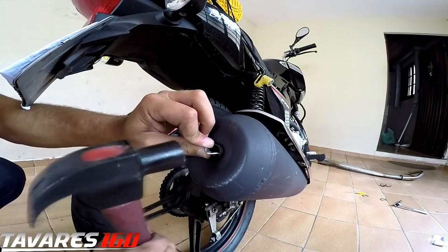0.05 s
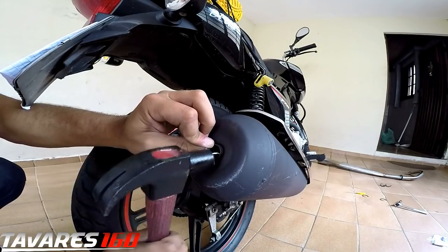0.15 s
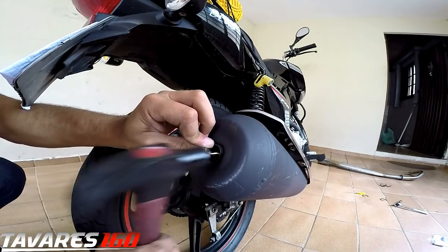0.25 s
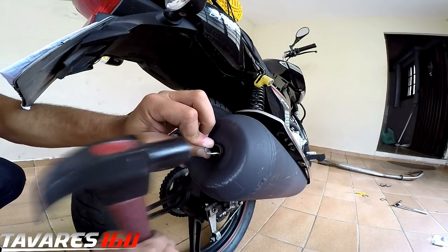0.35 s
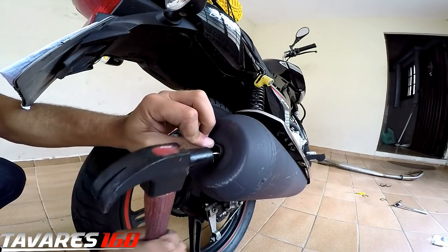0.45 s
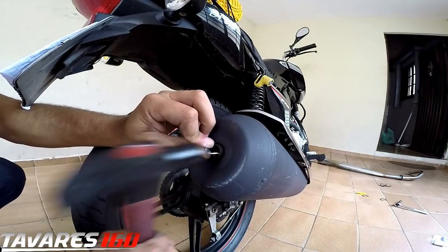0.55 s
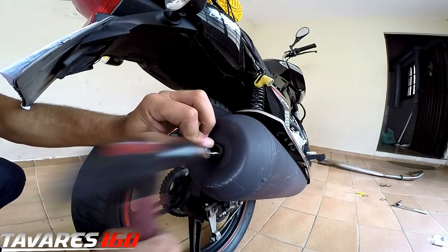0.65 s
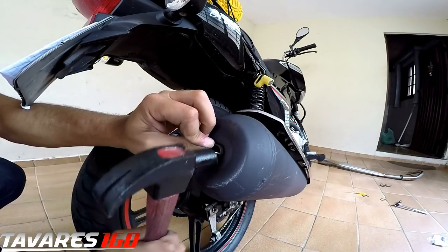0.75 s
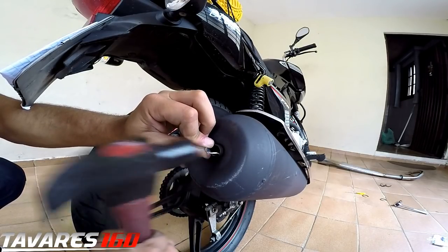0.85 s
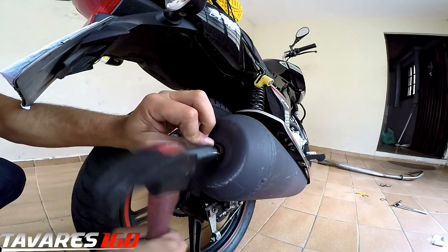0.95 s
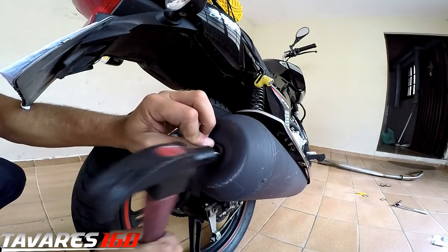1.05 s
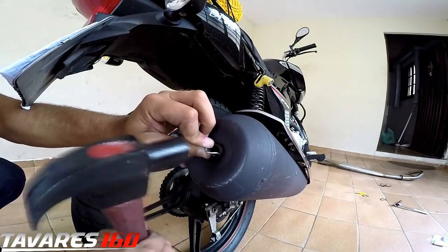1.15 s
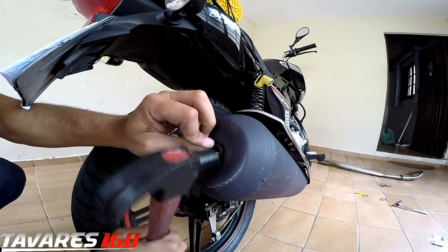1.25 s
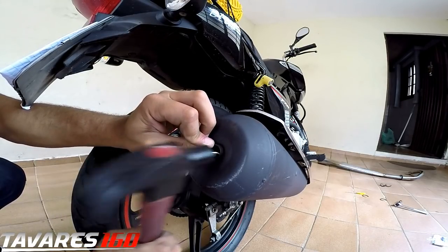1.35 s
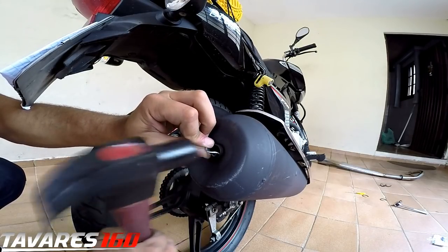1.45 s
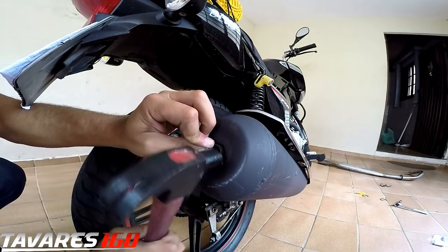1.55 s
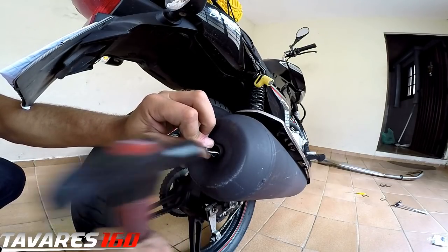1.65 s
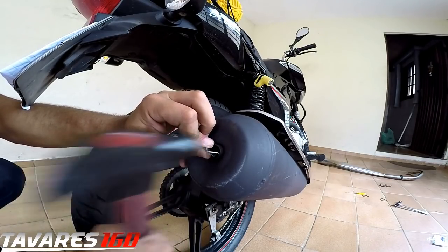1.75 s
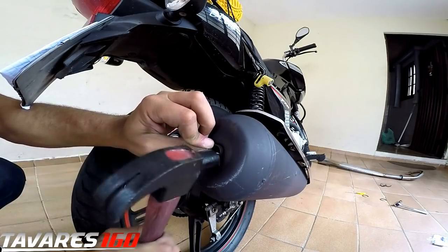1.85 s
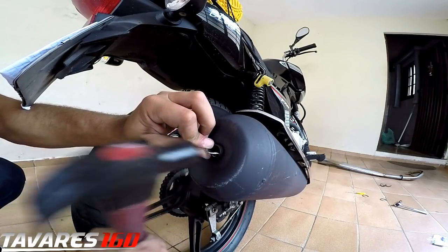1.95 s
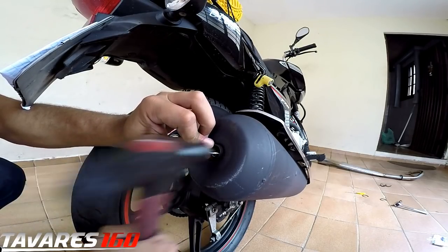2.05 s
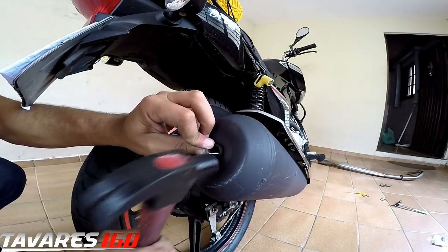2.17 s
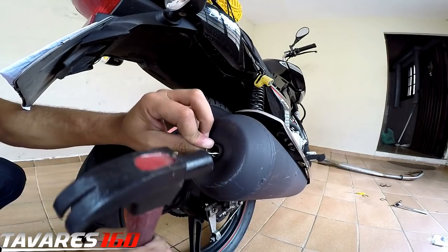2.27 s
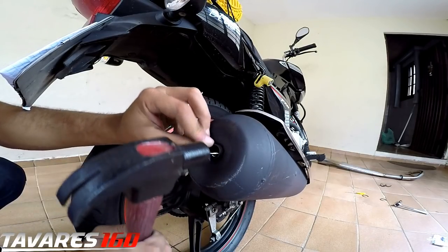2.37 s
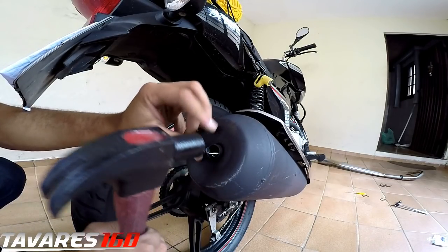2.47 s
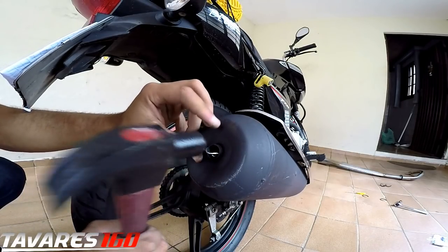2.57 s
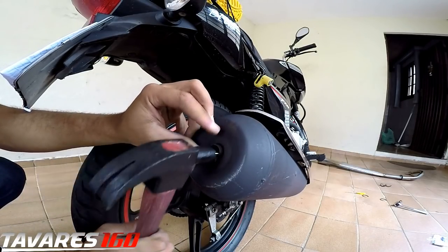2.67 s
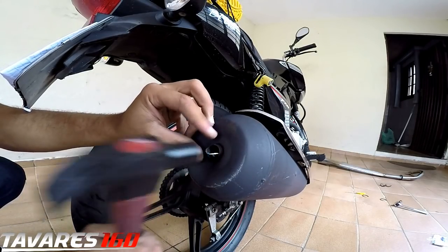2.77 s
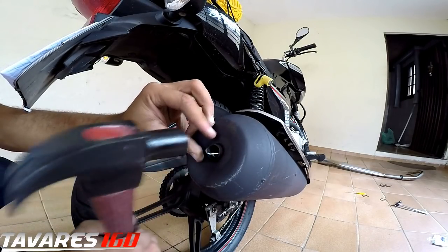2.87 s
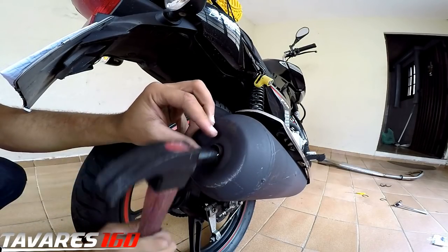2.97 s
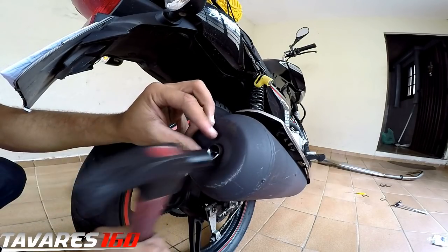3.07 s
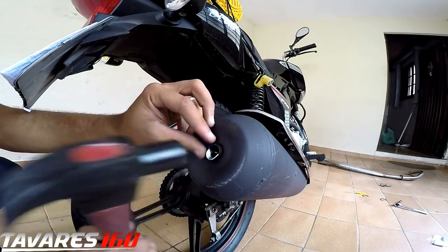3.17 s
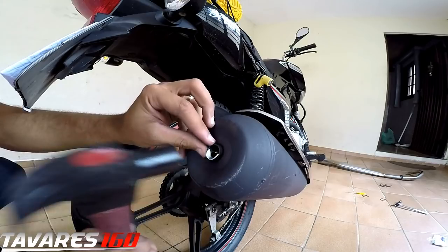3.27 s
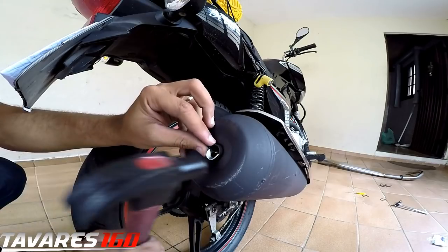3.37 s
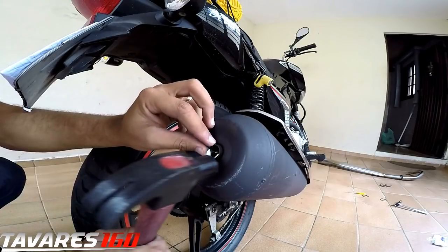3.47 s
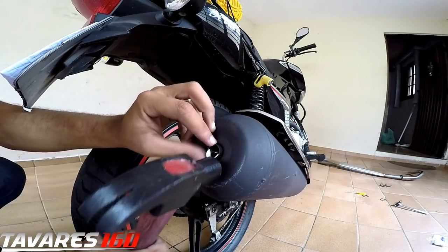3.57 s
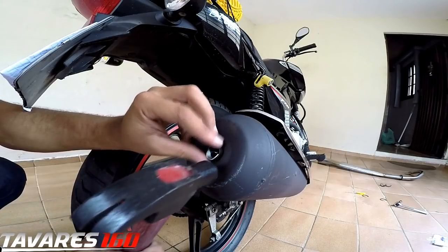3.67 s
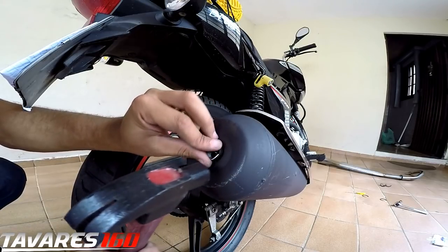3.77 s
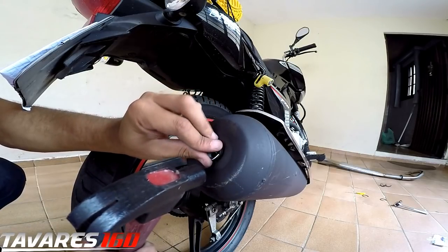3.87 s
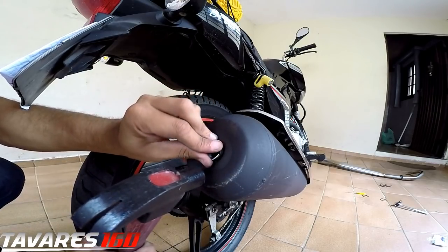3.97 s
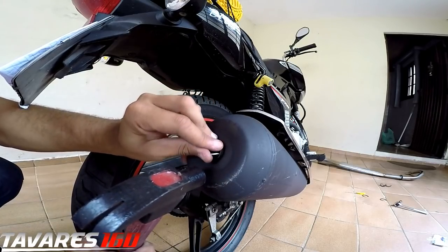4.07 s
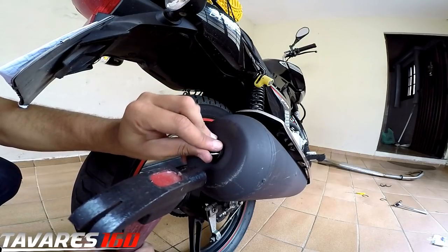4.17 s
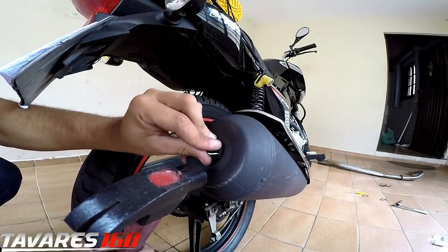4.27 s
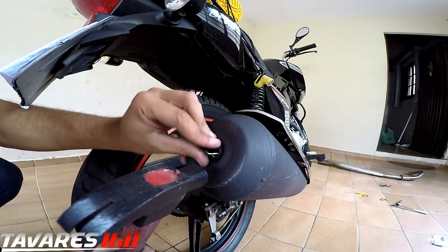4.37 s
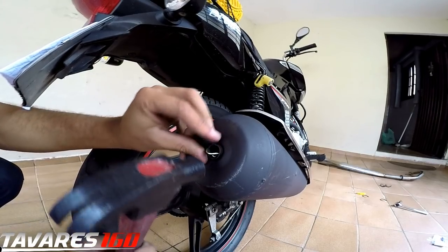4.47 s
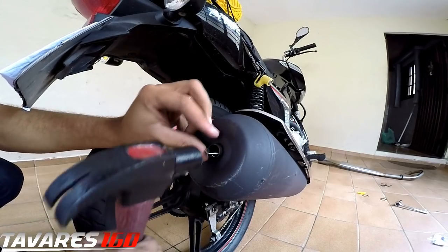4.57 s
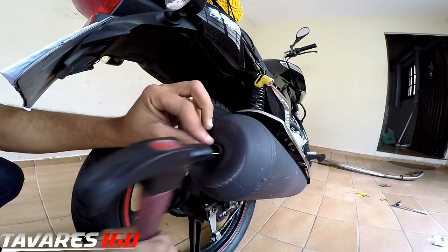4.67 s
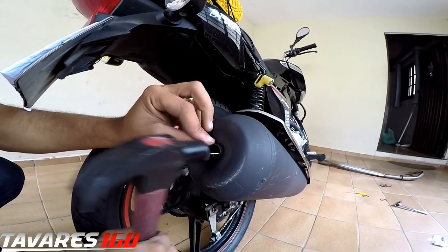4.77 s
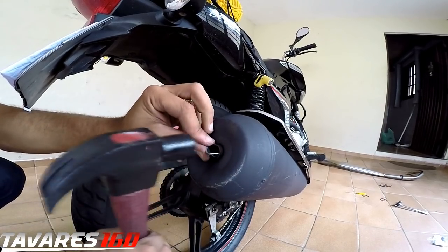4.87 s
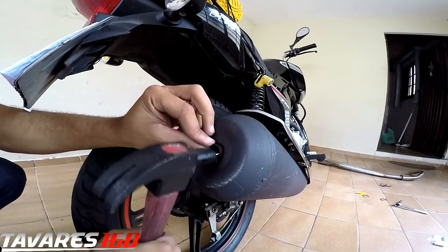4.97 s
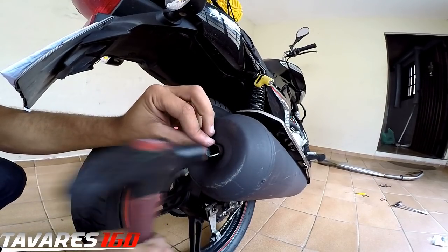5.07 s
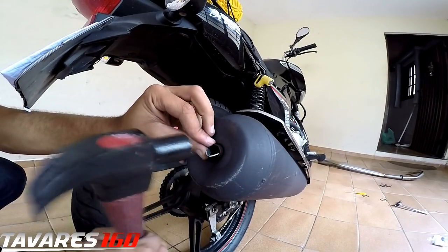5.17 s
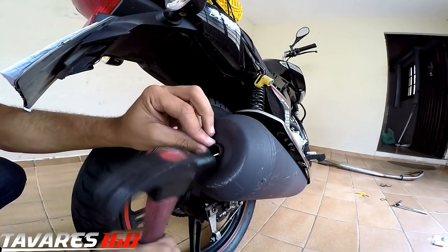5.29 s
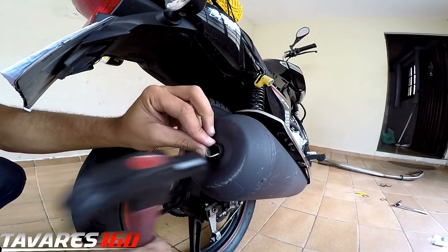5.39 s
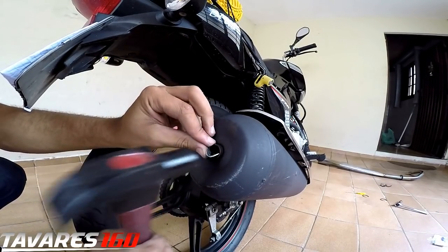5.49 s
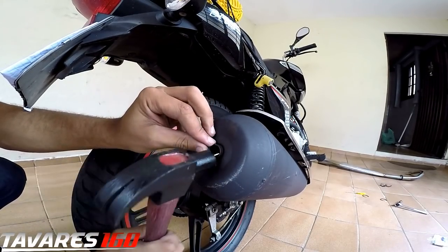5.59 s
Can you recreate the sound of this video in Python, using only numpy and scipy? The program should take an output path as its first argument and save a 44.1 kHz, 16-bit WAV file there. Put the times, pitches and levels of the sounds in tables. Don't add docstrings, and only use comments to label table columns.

```python
import sys
import numpy as np
from scipy import signal
from scipy.io import wavfile

SR = 44100
rng = np.random.default_rng(int(sys.argv[2]) if len(sys.argv) > 2 else 0)


def elevation(decibels):
    levels = np.asarray(decibels, float)
    return 10 ** (levels / 20)


def dump(signal):
    limited = np.clip(np.atleast_2d(signal).T, -1, 1)
    pcm = np.round(limited * 32767).astype(np.int16)
    wavfile.write(sys.argv[1], SR, pcm)


N = 248283
LEAD = SR // 5

# (per Hz, against the blow)
PORCH = [(60, 0.52, 4), (120, 0.25, 10.5), (198, 1.5, 5.5), (338, 1.73, 7), (556, 1.75, -3),
         (840, 1.59, -2), (1250, 2.04, -7.5), (1530, 1.42, -7), (2000, 1.48, -15), (3230, 1.3, -20.5),
         (4500, 1.2, -22.5), (6600, 1, -16), (8240, 0.8, -16.5), (10500, 0.84, -11), (16000, 0.64, -11.5)]


def rms_one(x):
    return x / np.sqrt(np.mean(x ** 2) + 1e-20)


def at_hz(points, hz, column=1):
    points = np.array(points)
    return np.interp(np.log(hz), np.log(points[:, 0]), points[:, column])


def band(x, low_hz, high_hz):
    return signal.sosfilt(signal.butter(2, [low_hz, high_hz], "band", fs=SR, output="sos"), x)


def bank(size, gain, low_hz=15, high_hz=20000):
    edges = 20 * 2 ** np.arange(0, 9.8, 1 / 3)
    edges = edges[(edges > low_hz) & (edges < high_hz)]
    white = rng.standard_normal((2, size))
    out = np.zeros(size)
    for k, (low, high) in enumerate(zip(edges, edges[1:])):
        out += gain(np.sqrt(low * high)) * band(white[k % 2], low, high)
    return out


def drift(rate_hz):
    pole = np.exp(-80 * np.pi * rate_hz / SR)
    slow = signal.lfilter([1], [1, -2 * pole, pole ** 2], rng.standard_normal(N // 40 + 2002))[2000:]
    return np.interp(np.arange(N) / 40, np.arange(len(slow)), rms_one(slow))


def surroundings():
    # freq_hz, level_db (per Hz)
    rumble_colour = [(11, -29), (18, -3), (73, -6), (92, -14), (129, -15), (140, -18), (171, -15.5),
                     (190, -28), (220, -38.5), (290, -72), (480, -120)]
    # freq_hz, level_db (per Hz)
    hiss_colour = [(130, -22.5), (220, 0.6), (400, -3.5), (650, -4.5), (1150, -8), (1700, -13.5),
                   (4000, -22), (8000, -27.5), (13000, -35), (16000, -41)]
    # time_s, level_db
    drone_path = [
        (0, -74),
        (3.5, -73),
        (3.85, -55.5),
        (4.2, -57),
        (4.5, -63.5),
        (5.63, -77),
    ]
    rumble = bank(N, lambda hz: elevation(at_hz(rumble_colour, hz) + 2.5 * drift(4.6)), high_hz=300)
    hiss = bank(N, lambda hz: elevation(at_hz(hiss_colour, hz)), low_hz=140)
    drone_db = np.interp(np.arange(N) / SR, *np.transpose(drone_path))
    drone = rms_one(band(rng.standard_normal(N), 590, 710))
    return elevation(-38.5) * rms_one(rumble) + elevation(-56.5) * rms_one(hiss) + elevation(drone_db) * drone


def scuffs():
    # start_s, level_db, length_s, centre_hz
    rubs = [
        (3.717, -62, 0.045, 6500),
        (4.098, -61, 0.017, 3500),
        (4.441, -66, .012, 3800),
        (4.505, -62, 0.0074, 4000),
        (4.55, -59, 0.048, 5500),
    ]
    out, t = np.zeros(N), np.arange(N) / SR
    grains = rng.standard_normal(N) * elevation(3.6 * drift(150))
    for start_s, level_db, length_s, centre_hz in rubs:
        near = slice(int((start_s - 0.1) * SR), int((start_s + 0.3) * SR))
        late = (t[near] - start_s) / length_s
        envelope = np.exp(-np.where(late < 0, 40 * late ** 2, late))
        puff = rms_one(band(grains[near], centre_hz * 0.6, centre_hz * 1.3))
        out[near] += elevation(level_db) * envelope * puff
    return out


def blow_table():
    # start_s, force_db, sharpness_db, frame_push_db, face_db
    blows = [(0.1592, -6, 2, -13, -6), (0.4456, -7, 1.5, -12.5, -5.5), (0.7187, -6, -0.8, -14, -5.5),
             (0.9911, -7, 0, -12.5, -11), (1.2715, -6, -1.3, -15, -10), (1.5416, -6, -0.8, -16, -12.5),
             (1.8306, -5.5, -2.5, -17, -10.5), (2.1177, -8, -1, -15.5, -3.5), (2.6915, -9, 0.3, -14, -7),
             (3.0088, -8.5, 2.5, -30, -4), (4.7578, -8.5, -6.5, -18, -18.5),
             (5.0058, -8.5, -2.5, -20.5, -8.5), (5.3330, -20.5, -8.5, -13.5, -2.5),
             (5.6004, -17.5, -6, -14.5, 2.5)]
    # force_db, sharpness_db, frame_push_db, face_db
    earlier = (-5.5, -1, -12.5, -6.5)
    start_s, force, sharp, push, face = np.transpose([(-0.115, *earlier)] + blows)
    sizzle = -17 + 0.45 * force + 0.57 * sharp + 0.42 * face
    lag_s = 0.0011
    at = np.round((start_s + lag_s) * SR).astype(int) + LEAD
    return at, np.array([force + push, force, force + sharp, force + face, sizzle])


def diffuse_level(hz, build_s):
    part_hz = (330, 1100, 3000, 8000, 11000)
    step = 16
    at, (frame_db, can_db, crack_db, face_db, sizzle_db) = blow_table()
    top_db = 0.27 * face_db + 0.47 * sizzle_db
    heavy_db = 0.19 * (frame_db + 22.5)
    parts_db = np.transpose([frame_db, can_db, crack_db, top_db, sizzle_db])
    heard_db = [np.interp(np.log(hz), np.log(part_hz), blow) for blow in parts_db]
    energy = np.zeros((N + LEAD) // step + 2)
    energy[at // step] = elevation(2 * (heavy_db + heard_db))
    fade = elevation(-120 * step / (at_hz(PORCH, hz) * SR))
    fill = np.exp(-step / (build_s * SR))
    height = np.sqrt(signal.lfilter([0, 1 - fill], np.convolve([1, -fade], [1, -fill]), energy))
    return np.repeat(height, step)[:N + LEAD]


def coloured(tail):
    # freq_hz, width_hz, level_db (over the plain tail)
    peaks = [(170, 38, 0.5), (342, 37, -1.5), (528, 24, -3), (824.5, 53, 0), (1126, 38, -4),
             (1245, 38, -4.5), (1632, 29, 1), (2400, 80, -11.5), (7000, 240, -7.5)]
    out = elevation(-2.0) * tail
    for hz, width_hz, level_db in peaks:
        r, w = np.exp(-np.pi * width_hz / SR), 2 * np.pi * hz / SR
        peak = (1 - r * r) / 2 * np.array([1, 0, -1])
        out = out + elevation(level_db) * signal.lfilter(peak, [1, -2 * r * np.cos(w), r * r], tail)
    return out


def porch(x):
    # delay_s, level_db
    echoes = [
        (.0035, -9),
        (.0062, -17),
    ]
    t = np.arange(SR) / SR
    response = elevation(-43) * rng.standard_normal(SR) * elevation(-50 * t) * (1 - np.exp(-t / 0.019))
    response = signal.lfilter(*signal.butter(1, 2500, fs=SR), response)
    response[0] = 1
    for delay_s, level_db in echoes:
        response[int(delay_s * SR)] += elevation(level_db)

    def tail_gain(hz):
        return elevation(at_hz(PORCH, hz, column=2) + 6) * diffuse_level(hz, build_s=0.0043)

    tail = bank(N + LEAD, tail_gain, low_hz=45)
    return signal.fftconvolve(x, response)[LEAD:LEAD + N] + coloured(tail)[LEAD:]


def strike(modes, at, blow_db, spread_db):
    out = np.zeros(N + LEAD)
    chance_db = spread_db * rng.standard_normal((len(at), len(modes))).T
    strength_db = np.transpose(blow_db) + chance_db
    for k, (hz, level_db, t60_s) in enumerate(modes):
        clicks = np.full(N + LEAD, 1e-18)
        sign = (-1) ** (k // 3 + 1)
        clicks[at] = sign * elevation(level_db + strength_db[k])
        r, w = elevation(-60 / (t60_s * SR)), 2 * np.pi * hz / SR
        out += signal.lfilter([0, np.sin(w)], [1, -2 * r * np.cos(w), r * r], clicks)
    return out


def free_ring(at, force_db):
    # time_s, can_free_db (how freely it drives the porch modes), rim_over_mouth_db (where
    # the blow lands), washer_free_db
    grip = [
        (0.1, -57, -6, -45),
        (.5, -32, 5, -52),
        (1.27, -27.5, 4.5, -50),
        (1.83, -26.5, -5, -45),
        (2.69, -28, 4, -37.5),
        (3.0, -20.5, 0.5, -39.5),
        (4.76, -30, -9.5, -39.5),
        (5.0, -21, -3.5, -43.5),
        (5.33, -19, -1.5, -53),
    ]
    time_s, *columns = np.transpose(grip)
    can, rim, washer = [np.interp((at - LEAD) / SR, time_s, column) for column in columns]
    low_washer = -19 + 0.76 * washer
    return np.transpose(force_db + np.array([can - rim, can + rim, low_washer, washer]))


def long_rings():
    # freq_hz, level_db, t60_s
    ring_modes = [(1274.9, 7, 1.35), (1284.3, 4.5, 1.35), (1266.4, 3, 1.35), (1258, -1, 1.35),
                  (1151.7, 5, 1.3), (1127.6, -3, 1.3), (1144.4, 0, 1.3), (1172.2, -1.5, 1.3),
                  (3216, 13, .6), (5562, 10, .9)]
    group = [1, 1, 1, 1, 0, 0, 0, 0, 2, 3]
    at, (_, force_db, *_) = blow_table()
    return strike(ring_modes, at, free_ring(at, force_db)[:, group], spread_db=1.9)[LEAD:]


def rebounds():
    # start_s, level_db
    jumps = [
        (0.1834, -13),
        (.4622, -7),
        (0.7361, -7.5),
        (1.0068, -10.5),
        (1.0168, -11.5),
        (1.2856, 1),
        (1.8402, -17.5),
    ]
    # freq_hz, level_db, t60_s
    seat_modes = [(1570, 2.5, 0.0038), (2630, -2, 0.0048), (6600, -24, 0.016)]
    start_s, level_db = np.transpose(jumps)
    at = np.round(start_s * SR).astype(int) + LEAD
    return strike(seat_modes, at, level_db - 1.5, spread_db=9.0)


def burst(at, blow_db, noise, fast_s, slow_s, slow_db):
    t = np.arange(SR // 8) / SR
    shape = np.exp(-t / fast_s) + elevation(slow_db) * np.exp(-t / slow_s)
    envelope = np.zeros(N + LEAD + len(t))
    for i, db in zip(at, blow_db):
        envelope[i:i + len(t)] += elevation(db) * shape
    return envelope[:N + LEAD] * rms_one(noise)


def hammering():
    # freq_hz, level_db, t60_s
    frame_modes = [(62, -12, 0.02), (118, 8.5, 0.062), (176.25, 1, 0.7), (217, -8.5, 0.033),
                   (309.4, -11, 0.94), (333.5, -12, 1), (392.3, 0.5, 0.33), (518.5, 1.5, 0.18),
                   (680, 1, 0.11)]
    # freq_hz, level_db, t60_s
    can_modes = [(766, -17, 0.078), (830, -27.5, 0.24), (855, -10, 0.18), (924, -12.5, 0.091),
                 (1048, -14.5, 0.46), (1100, 1, 0.04), (1194, -13, 0.23), (1200, 2.5, 0.01),
                 (1287, -8, 0.18), (1326, -6.5, 0.028), (1357, -11, 0.29), (1413, -9, 0.067),
                 (1700, -19.5, 0.12), (1643, -25, 0.85), (1564, 1.5, 0.027), (1760, -4, 0.018),
                 (2124, -9, 0.05), (2441, -16.5, 0.13), (2880, -18, 0.037), (3220, -19.5, 0.21)]
    # freq_hz, level_db, t60_s
    face_modes = [(6190, -7.5, 0.012), (6600, 3.4, 0.013), (6690, -4.5, 0.013), (8400, -6.5, 0.011)]
    # freq_hz, level_db (per Hz)
    crack_colour = [(400, -14), (1200, 5.5), (2000, 3.5), (3500, 4), (5000, -8), (7500, -0.5),
                    (10000, -10.5), (15000, -20.5)]
    at, (frame_db, can_db, crack_db, face_db, sizzle_db) = blow_table()
    frame = strike(frame_modes, at, frame_db - 2.5, spread_db=2.0)
    frame = signal.lfilter([0.15], [1, -0.85], frame)
    can = strike(can_modes, at, can_db - 2.5, spread_db=2.5)
    can = signal.lfilter(np.hanning(9) / 4, [1], can)
    face = strike(face_modes, at, face_db + 0.74, spread_db=2.5)
    crack_noise = bank(N + LEAD, lambda hz: elevation(at_hz(crack_colour, hz)), low_hz=450)
    crack = burst(at, crack_db - 3.0, crack_noise, fast_s=0.00083, slow_s=0.0081, slow_db=-6.5)
    fine_noise = band(rng.standard_normal(N + LEAD), 9500, 17000)
    sizzle = burst(at, sizzle_db + 2.5, fine_noise, fast_s=0.0015, slow_s=0.011, slow_db=-4.5)
    return frame + can + face + crack + sizzle + rebounds()


def scene():
    return (porch(hammering()) + long_rings() + scuffs() + surroundings())[None]


def band_limit(x):
    return signal.sosfilt(signal.butter(12, 16500, fs=SR, output="sos"), x)


def record(dry):
    top_cut = signal.cheby1(14, 1, 15300, fs=SR, output="sos")
    ceiling = 1.05
    rounded = ceiling * np.tanh(1.03 * signal.sosfilt(top_cut, dry) / ceiling)
    return band_limit(rounded)


dry = scene()
out = record(dry)
dump(out)
```